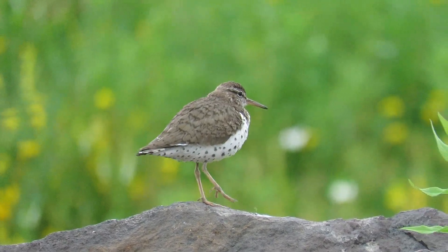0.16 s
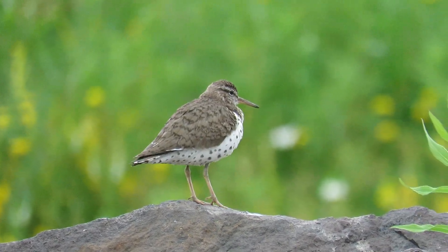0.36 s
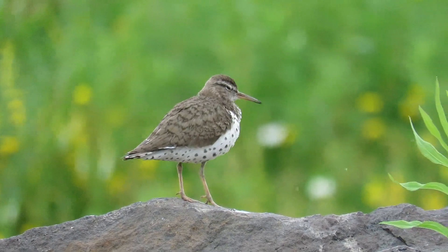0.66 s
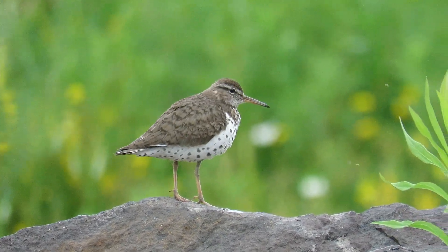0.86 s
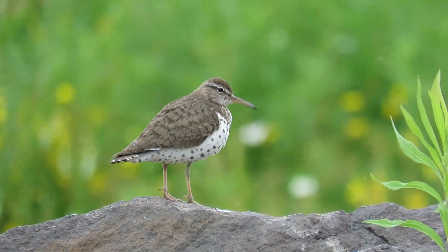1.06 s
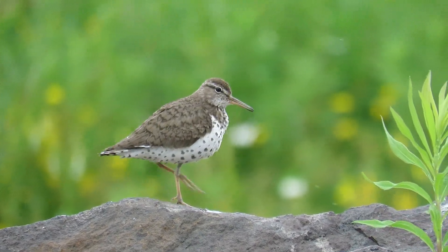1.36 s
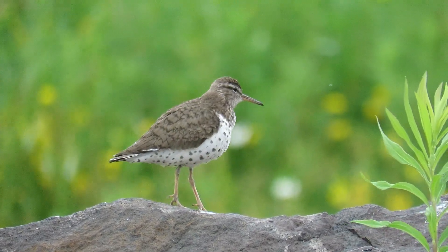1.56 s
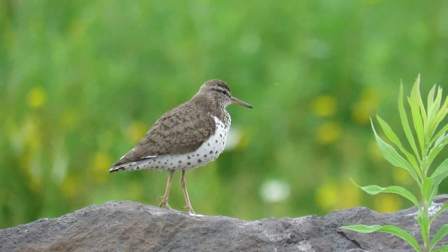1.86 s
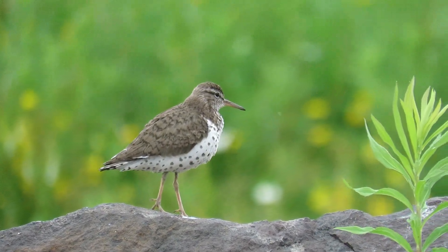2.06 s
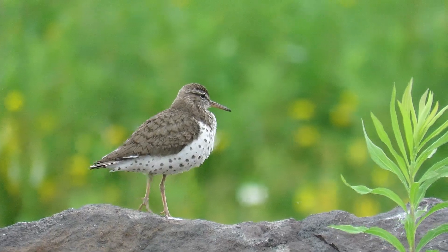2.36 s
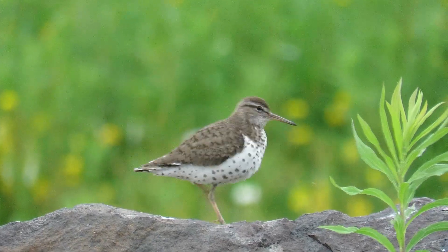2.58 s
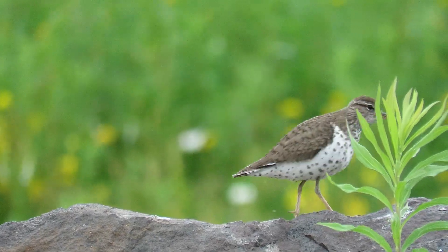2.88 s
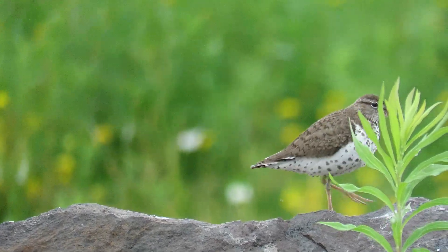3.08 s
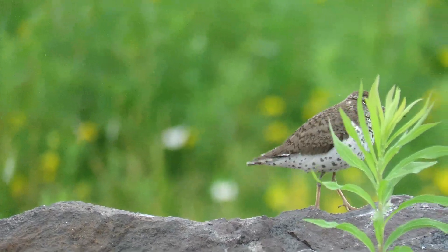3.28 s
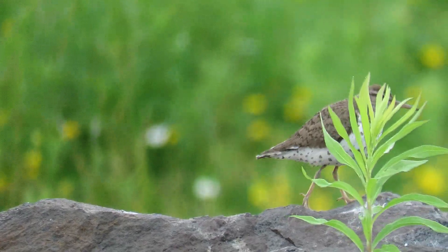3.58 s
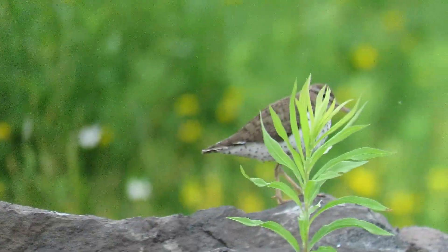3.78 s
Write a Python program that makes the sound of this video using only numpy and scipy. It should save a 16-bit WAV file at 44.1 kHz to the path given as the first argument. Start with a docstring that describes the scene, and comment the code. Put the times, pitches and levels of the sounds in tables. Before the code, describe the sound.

A sandpiper gives short, clear, rising chirps at 0.6, 1.4 and 2.85 s, over a soft steady far roar. Faint songbirds whistle from 0.7 to 2.6 s, then trill at 2.6-3.3 s. The handheld camera creaks and scratches, with cloth rustle, mainly at 0-0.1, 1.0-1.6 and 2.7-3.3 s. Light wind thuds build to a hard overloading gust at 3.27 s; everything ducks, and low buffeting fades by 3.9 s.

```python
"""A camera's two microphone ports, in the hand: a far roar (steady coloured noise) runs throughout while the
housing creaks and scratches (short rings, noise bursts) and cloth brushes by (crackly hiss).
A sandpiper on a rock then chirps three times (gliding near-sines); far songbirds whistle and later trill
(gliding sines). Wind buffets the ports (low noise and single swings), until one hard gust near the end
makes the gain control duck everything."""
import sys
import numpy as np
from scipy import signal
from scipy.fft import rfft, irfft
from scipy.io import wavfile
from scipy.ndimage import uniform_filter1d

SR = 44100
rng = np.random.default_rng(int(sys.argv[2]) if len(sys.argv) > 2 else 0)


def transcribe(signal):
    """Save signal, clipped to [-1, 1], as a 16-bit WAV file at the path in sys.argv[1]."""
    frames = np.atleast_2d(signal).T
    limited = np.clip(frames, -1, 1)
    pcm = np.round(limited * 32767).astype(np.int16)
    wavfile.write(sys.argv[1], SR, pcm)


def undo_db(level):
    """Turn decibels back into plain size, where 20 dB means ten times bigger."""
    steps = np.asarray(level, float) / 20
    return 10 ** steps


N = 173313

# spectrum of handling and cloth noise: hz, level_db (relative)
RUSTLE_SPECTRUM = [(590, -25), (1000, 11.5), (1420, -37), (1660, -1.5), (2110, -3.5), (3310, -12),
                   (4740, -12.5), (6010, -24), (6880, -21), (14800, -41)]


def evened(x):
    """Scales to rms 1."""
    return x / np.sqrt(np.mean(x ** 2) + 1e-20)


def add(mix, start_s, sound):
    """Mixes a sound in at a time, cutting what runs past the end."""
    part = mix[..., max(round(start_s * SR), 0):][..., :sound.shape[-1]]
    part += sound[..., :part.shape[-1]]


def colour(x, spectrum, tilt_db=0.):
    """Filters by a spectrum table and a tilt in dB per octave about 4 kHz."""
    hz = np.fft.rfftfreq(x.shape[-1], 1 / SR) + 1  # the 1 keeps the logarithm finite
    table_hz, table_db = np.transpose(spectrum)
    db = np.interp(np.log(hz), np.log(table_hz), table_db, -90, -90)
    db = db + tilt_db * np.log2(hz / 4000)
    return irfft(rfft(x) * undo_db(db), x.shape[-1])


def curve(rows, column):
    """Gain over time, drawn straight in dB between the rows of a table."""
    rows = np.array(rows)
    return undo_db(np.interp(np.arange(N) / SR, rows[:, 0], rows[:, column]))


def slow_drift(n, top_hz):
    """Smooth random drift of rms 1: eight sines of random phase up to top_hz."""
    t = np.arange(n) / SR
    rates = np.geomspace(top_hz / 8, top_hz, num=8)
    return sum(np.sin(2 * np.pi * (hz * t + rng.random())) for hz in rates) / 2


def ragged(n, db, size):
    """Fast random flicker of level, db rms, smoothed over size samples."""
    return undo_db(db * evened(uniform_filter1d(rng.standard_normal(n), size)))


def panned(x, left_over_right_db):
    """Places a sound left or right by level."""
    return x * undo_db([[left_over_right_db / 2], [-left_over_right_db / 2]])


def patchy_noise(spectrum, patchy_db, lump_s):
    """Coloured noise of rms 1 whose level drifts in patches of time and pitch."""
    z = signal.stft(colour(rng.standard_normal(N), spectrum), nperseg=512, noverlap=384)[2]
    lump_frames = max(round(lump_s * SR / 128), 1)
    patches = uniform_filter1d(rng.standard_normal(z.shape), lump_frames, axis=1)
    patches = evened(uniform_filter1d(patches, size=5, axis=0))
    return evened(signal.istft(z * undo_db(patchy_db * patches), nperseg=512, noverlap=384)[1][:N])


def sandpiper():
    """Near-sine chirps with weak overtones, then a short decaying scatter from rocks and plants."""
    # four notes, the middle two making one chirp; in each: time_s, pitch_hz, level_db
    notes = [
        [(0.628, 1970, -68), (0.632, 1940, -50), (0.648, 3110, -49), (0.654, 3446, -40), (0.664, 3580, -42),
         (0.692, 3440, -48.5), (0.698, 3400, -46), (0.706, 2870, -48), (0.712, 2899, -63)],
        [(1.374, 2150, -52), (1.381, 2350, -50), (1.385, 2900, -44), (1.389, 3050, -52), (1.394, 3300, -43),
         (1.399, 3680, -39), (1.405, 3660, -40.5), (1.408, 3600, -50)],
        [(1.406, 3253, -46), (1.414, 3275, -40), (1.43, 3245, -42), (1.433, 3150, -51), (1.437, 2950, -45),
         (1.441, 2780, -56)],
        [(2.84, 2100, -59), (2.844, 2300, -62), (2.854, 3060, -43.5), (2.862, 3940, -44), (2.868, 3928, -39),
         (2.888, 3927, -38), (2.904, 3895, -37), (2.914, 3830, -64)],
    ]
    # per note: second_partial_db, third_partial_db (relative to the first)
    overtones = [(-20, -48), (-23, -46), (-19, -32), (-35, -30)]
    glide_loss_db = .14  # overtones thin out by this per kHz/s of glide
    flutter_db = 1.3  # rms
    echo_db, echo_t60_s = -11, .2
    out = np.zeros(N)
    for rows, (second_db, third_db) in zip(notes, overtones):
        time_s, pitch_hz, level_db = np.transpose(rows)
        t = np.arange(time_s[0], time_s[-1], 1 / SR)
        hz = uniform_filter1d(np.interp(t, time_s, pitch_hz), size=60)
        glide = abs(np.gradient(hz)) * SR / 1000
        thin = undo_db(-glide_loss_db * uniform_filter1d(glide, size=150))
        phase = 2 * np.pi * np.cumsum(hz) / SR
        overtone = undo_db(second_db) * np.sin(2 * phase) + undo_db(third_db) * np.sin(3 * phase)
        tone = np.sin(phase) + thin * overtone
        level = undo_db(np.interp(t, time_s, level_db) + flutter_db * slow_drift(len(t), 268))
        add(out, time_s[0], np.sqrt(2) * tone * level * signal.windows.tukey(len(t), .1))
    t = np.arange(8000) / SR
    tail = rng.standard_normal((2, len(t))) * undo_db(-60 * t / echo_t60_s) * np.minimum(t / 0.0048, 1)
    tail /= np.linalg.norm(tail[0])
    return out + undo_db(echo_db) * signal.fftconvolve(out[None], tail, axes=1)[:, :N]


def whistle(length_s, level_db, start_hz, end_hz, fade_db):
    """A whistle that swells in, glides a little and fades, wavering with the air."""
    rise, release = .27, .14  # shares of the length
    waver_db, waver_hz = 2.2, 9.  # rms
    u = np.arange(round(length_s * SR)) / (length_s * SR)
    shape = (np.minimum(u / rise, 1) * np.minimum((1 - u) / release, 1)) ** 1.5
    shape *= undo_db(-fade_db * np.maximum(u - rise, 0))
    hz = start_hz + (end_hz - start_hz) * (1 - np.exp(-u / rise))
    hz = hz + waver_hz * slow_drift(len(u), 36.0)
    level = undo_db(level_db + waver_db * slow_drift(len(u), 39.6))
    return np.sqrt(2) * shape * level * np.sin(2 * np.pi * np.cumsum(hz) / SR)


def quick_note(length_s, level_db, start_hz, end_hz):
    """A quick gliding sine under a half-sine swell."""
    u = np.arange(round(length_s * SR)) / (length_s * SR)
    hz = start_hz + (end_hz - start_hz) * u
    return np.sqrt(2) * undo_db(level_db) * np.sin(np.pi * u) * np.sin(2 * np.pi * np.cumsum(hz) / SR)


def songbirds():
    """Distant whistles, brief gliding blips and a trill of one quick repeated figure."""
    # start_s, length_s, level_db, start_hz, end_hz (approached), fade_db (per whole length),
    # left_over_right_db
    whistles = [(.715, .08, -67, 3550, 3480, 8, 2), (.855, .135, -58, 3380, 3240, 12, 1.5),
                (1.165, .195, -58, 4620, 4515, 8, -1.5), (1.56, .26, -54, 4560, 4410, 22, -2.5),
                (1.915, .28, -52, 3880, 3780, 6, 1.5), (1.95, .105, -61, 4500, 4380, 0, -1.5),
                (2.305, .255, -47.5, 3790, 3722, 13, 1), (3.52, .04, -65, 4620, 4570, 3, 0),
                (3.565, .145, -62.5, 2560, 2680, -9, 0), (3.835, .068, -56, 5560, 5500, 7, -3)]
    # brief gliding blips, the first an overtone of the sandpiper's first chirp:
    # start_s, length_s, level_db, start_hz, end_hz
    blips = [(.637, .009, -57, 4250, 4800), (1.176, .01, -62, 5300, 4600), (1.81, .016, -61, 4350, 3250),
             (1.451, .005, -63, 8700, 8600), (3.512, .012, -60, 5400, 4600)]
    # falling notes of the trill figure: delay_s, length_s, level_db (before the offsets below),
    # start_hz, end_hz
    figure = [(0, 0.021, -45.5, 2630, 2390), (0.066, 0.015, -62, 5860, 5300),
              (0.117, .016, -60.5, 7400, 6700), (.128, 0.011, -62, 6350, 4940)]
    # repeats of the figure: start_s, first_note_offset_db, later_notes_offset_db
    repeats = [(2.625, -1, -8), (2.79, -3, -7), (2.957, 0, -2), (3.123, 0, -1), (3.29, 6, 3)]
    out = np.zeros((2, N))
    for start_s, *row, pan_db in whistles:
        add(out, start_s, panned(whistle(*row), pan_db))
    for start_s, *row in blips:
        add(out, start_s, quick_note(*row))
    for start_s, first_db, later_db in repeats:
        for delay_s, length_s, db, start_hz, end_hz in figure:
            level_db = db + (later_db if delay_s else first_db)
            sound = quick_note(length_s, level_db, start_hz, end_hz)
            add(out, start_s + delay_s, panned(sound, 5))
    return out


def wind():
    """Rumble shared by both ports, buffeting opposed between them, and single blows crossing the pair."""
    # time_s, shared_rumble_db, opposed_buffeting_db
    strength = [(0, -43, -64), (.85, -38.5, -58), (1, -39.5, -48), (1.55, -42, -56), (1.75, -40, -49),
                (2.1, -40.5, -44), (2.4, -40.5, -52), (2.75, -37, -38), (3, -42, -58), (3.22, -38.5, -54),
                (3.33, -21.5, -31.5), (3.45, -16.5, -19.5), (3.54, -19.5, -23), (3.6, -23.5, -33),
                (3.68, -26, -26), (3.72, -35, -62), (3.77, -29, -36), (3.82, -33, -69), (3.93, -53, -87)]
    # spectra: hz, level_db (relative)
    rumble = [(15, -46), (25, -29), (52, -3), (76, -1), (102, -0.5), (184, -4), (281, -17), (330, -26.5),
              (430, -28), (730, -120)]
    buffeting = [(18, -50), (30, -30), (81, 4), (179, 1.5), (310, -7), (475, -18.5), (530, -21),
                 (800, -42.5), (1040, -58), (1760, -120)]
    # single blows: peak_s, length_s, peak_db, centre_pitch_hz, right_port_lag_ms
    blows = [(1.689, 0.0036, -22, 140, 2.5), (1.78, 0.0094, -25, 178, 5), (1.968, 0.0094, -26, 104, 2),
             (2.06, 0.0066, -25, 250, 2.5), (2.14, 0.013, -30.5, 100, 3.5),
             (2.264, 0.017, -22.5, 218, -1.5), (2.282, 0.0041, -15.5, 124, -3), (2.5, 0.023, -36, 113, 4.5),
             (2.625, 0.0041, -26.5, 209, 1.5), (2.755, 0.0054, -13, 140, 4), (2.776, 0.0072, -24, 91, 4.5),
             (3.256, 0.0083, -20, 128, 6.5), (3.2762, .0065, 1.5, 255, 2.2),
             (3.2885, 0.0025, 3.5, 179, -1.5), (3.312, 0.0018, -7, 173, 2.5),
             (3.475, 0.0088, -11, 191, 0.5), (3.515, 0.0014, -10, 260, 4.5), (3.53, 0.008, -11.5, 271, 3),
             (3.596, 0.003, -9, 264, 2), (3.644, 0.0014, -8, 347, 3.95), (3.66, 0.0016, -14, 212, 3.5),
             (3.75, 0.0036, -25, 142, 9.5)]
    spread = 0.46  # the swing slows away from the centre of a blow
    mid = curve(strength, 1) * patchy_noise(rumble, 0.52, 0.028)
    side = curve(strength, 2) * patchy_noise(buffeting, 3.9, 0.022)
    out = np.array([mid + side, mid - side])
    for peak_s, length_s, db, hz, lag_ms in blows:
        t = np.arange(-.06, .06, 1 / SR) - np.array([[0], [lag_ms / 1000]])
        swing = np.cos(2 * np.pi * hz * t / (1 + abs(t / length_s)) ** spread)
        add(out, peak_s - .06, undo_db(db) * np.exp(-abs(t / length_s) ** 2.34) * swing)
    return out


def finger_slips():
    """Tiny random slips under the fingers, each ringing the modes of the housing; rms 1."""
    # housing modes: pitch_hz, level_db (relative), t60_s
    modes = [(1450, -2.5, .03), (1833, -2, .028), (2045, 5, .022), (2318, -2, .02), (2670, -8, .016),
             (3260, -10, .015), (4000, -8, .015), (5250, -16, .008), (7060, -14, .008)]
    slips_per_s, size_spread_db = 200, 5.3  # slips drawn afresh for each mode
    t = np.arange(2600) / SR
    slips = np.zeros(N)
    for hz, db, t60_s in modes:
        size = undo_db(size_spread_db * np.minimum(rng.exponential(1, N), 4))
        size = size * (rng.random(N) < slips_per_s / SR)
        ring = undo_db(db - 60 * t / t60_s) * np.minimum(t / 0.0011, 1) * np.sin(2 * np.pi * hz * t)
        slips += signal.oaconvolve(size, ring)[:N]
    return evened(slips)


def housing():
    """Rustle and slips under the fingers, three-mode ringing creaks and dry noise scratches."""
    # time_s, handling_db (before the slip and rustle shares)
    hand = [(0.0, -49), (0.35, -56), (0.58, -60.5), (1.09, -54), (1.25, -47), (1.44, -46.5), (1.78, -56.5),
            (2.53, -57.5), (2.74, -51.5), (2.87, -46), (2.96, -48), (3.13, -48.5), (3.27, -51.5),
            (3.65, -56), (3.82, -52.5)]
    # start_s, level_db (relative), ring_hz
    creaks = [(0.0343, -37, 2040), (0.062, -29, 1780), (0.084, -21, 1910), (0.11, -32, 1550),
              (0.3874, -47, 2070), (1.044, -29.5, 2230), (1.0778, -34, 3850), (1.0924, -27.5, 2520),
              (1.0965, -22, 2270), (1.1046, -32, 2420), (1.2248, -43, 1800), (1.2735, -28, 2170),
              (1.328, -32, 1880), (1.496, -26.5, 2170), (1.586, -46, 1760), (1.6381, -27, 1980),
              (1.7872, -28, 1930), (2.783, -27, 1690), (2.7924, -23, 2160), (2.984, -29.5, 2440),
              (3.015, -32, 1970), (3.185, -40, 1970), (3.197, -27.5, 1440), (3.2335, -19.5, 1980),
              (3.2395, -41, 3970), (3.2478, -23.5, 2150), (3.25, -40, 4160), (3.264, -30.5, 2050),
              (3.394, -36.5, 2000), (3.478, -39, 2820)]
    # peak_s, decay_s (time constant), level_db (before its shape), tilt_db_per_octave
    scratches = [(.064, .0027, -46, 3), (1.078, .006, -44, 2), (1.0932, .003, -36, 1),
                 (1.0967, .004, -38, 3), (1.1045, .003, -42, 1), (1.117, .002, -46, 7),
                 (2.7197, .0018, -34, 7), (2.784, .003, -37, -1), (2.793, .003, -38, 1),
                 (2.802, .004, -35, 4.5), (3.238, .02, -44, 0)]
    slips_db, rustle_db = -2, -3
    creak_t60_s, creak_rise_s = .019, .0012
    scratch_rise = .25  # rise over decay time
    rustle = evened(patchy_noise(RUSTLE_SPECTRUM, 1.8, .015) * ragged(N, 3, size=160))
    out = curve(hand, 1) * (undo_db(slips_db) * finger_slips() + undo_db(rustle_db) * rustle)
    t = np.arange(2600) / SR
    detunings = rng.uniform(.92, 1.08, (len(creaks), 2))
    for (start_s, db, hz), (low, high) in zip(creaks, detunings):
        ring = np.sin(2 * np.pi * hz * t)
        ring += 0.24 * np.sin(2 * np.pi * hz * 0.638 * low * t)
        ring += 0.43 * np.sin(2 * np.pi * hz * 1.23 * high * t)
        shape = undo_db(db - 60 * t / creak_t60_s) * np.minimum(t / creak_rise_s, 1)
        add(out, start_s, 0.55 * shape * ring)
    for peak_s, decay_s, db, tilt_db in scratches:
        shape = np.exp(-abs(t - .025) / (decay_s * np.where(t < .025, scratch_rise, 1)))
        grit = ragged(len(t), 5, size=16) * rng.standard_normal(len(t))
        add(out, peak_s - .025, undo_db(db) * shape * evened(colour(grit, RUSTLE_SPECTRUM, tilt_db)))
    # a delayed, treble-rich copy of opposite sign in each port gives width
    spread = .5 * np.roll(np.diff(out, n=2, prepend=[0, 0]), shift=11)
    return np.array([out + spread, out - spread])


def cloth():
    """Cloth close to the ports: bright crackly hiss, partly shared between them."""
    # time_s, level_db
    brushing = [(0, -77), (.12, -61), (.3, -82), (1.02, -81), (1.07, -48.5), (1.13, -52), (1.2, -59.5),
                (1.42, -54), (1.55, -78), (2.68, -81), (2.74, -50), (2.8, -48.5), (2.9, -58.5),
                (3.1, -60.5), (3.22, -61), (3.28, -55), (3.32, -69)]
    tilt_db, crackle_db = 3, 4.2  # per octave; rms
    hiss = rng.standard_normal((2, N)) + 0.45 * rng.standard_normal(N)
    hiss = colour(hiss, RUSTLE_SPECTRUM, tilt_db)
    return curve(brushing, 1) * evened(hiss * ragged(N, crackle_db, size=220))


def roar():
    """Steady far wash of coloured noise, mostly centred."""
    # spectra of centre and sides: hz, level_db (relative, per Hz)
    centre = [(120, -10), (200, -12), (343, -3), (426, -6), (450, -4), (501, -4), (579, -4), (745, -6),
              (845, -5), (994, -10), (10500, -49), (13300, -51), (14800, -66)]
    sides = [(47, -38), (80, -30), (188, -15.5), (219, -4.5), (377, -4), (3010, -26), (3430, -27),
             (3820, -27), (14800, -48)]
    centre_db, sides_db = -43, -50.5
    mid = undo_db(centre_db) * patchy_noise(centre, 1.68, 0.021)
    side = undo_db(sides_db) * patchy_noise(sides, 1.1, 0.053)
    return np.array([mid + side, mid - side])


def scene():
    """All sources at the microphone pair."""
    return sandpiper() + songbirds() + wind() + housing() + cloth() + roar()


def top_cut(x):
    """Nothing passes above the cut-off."""
    return signal.sosfilt(signal.butter(12, 14970, fs=SR, output="sos"), x)


def record(dry):
    """Gain control drops just after a peak over its limit and recovers slowly, with a low cut; ceiling."""
    limit_db, recover_db_per_s = -4.5, 6.5
    react_s = .0035  # waits this long, then falls over as long again
    low_cut_hz = 90
    peak_db = 20 * np.log10(abs(dry).max(0) + 1e-9)
    recovery_db = np.arange(N) * recover_db_per_s / SR
    held_db = np.maximum.accumulate(peak_db + recovery_db) - recovery_db
    over_db = np.maximum(held_db - limit_db, 0)
    wait = round(react_s * SR)
    duck_db = np.convolve(over_db, np.r_[np.zeros(wait), np.ones(wait) / wait])[:N]
    high_pass = signal.butter(2, low_cut_hz, "high", fs=SR, output="sos")
    thin = signal.sosfilt(high_pass, dry)
    cut = np.clip(duck_db / 5, 0, 1)  # low cut is fully in at 5 dB of ducking
    ducked = (dry + cut * (thin - dry)) / undo_db(duck_db)
    return top_cut(np.clip(ducked, -.95, .95))


dry = scene()
out = record(dry)
transcribe(out)
```